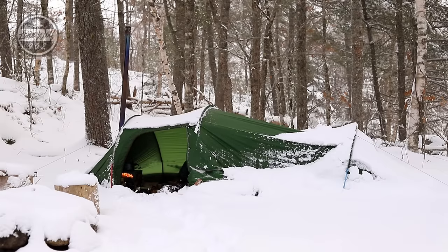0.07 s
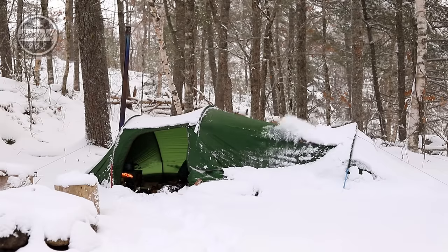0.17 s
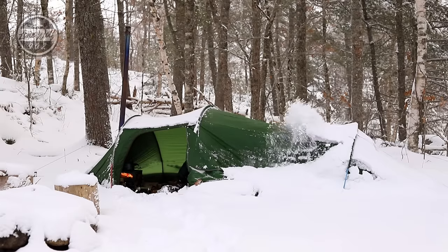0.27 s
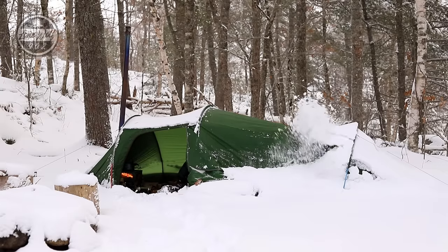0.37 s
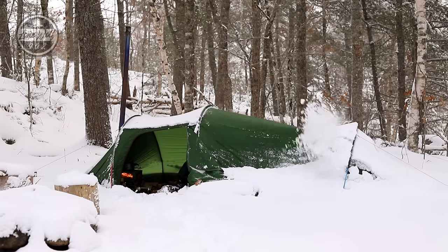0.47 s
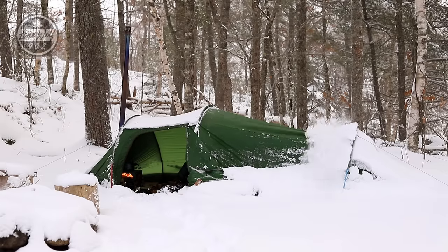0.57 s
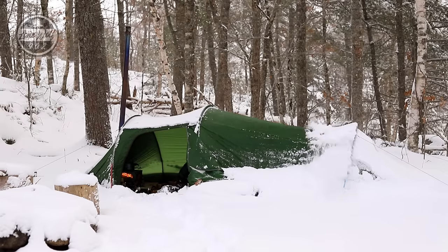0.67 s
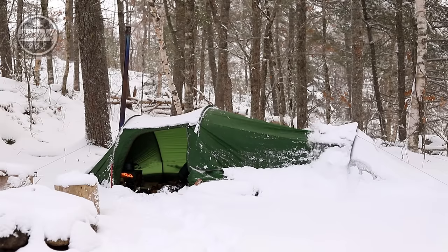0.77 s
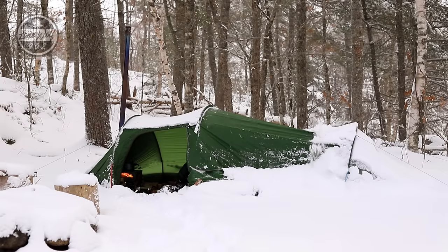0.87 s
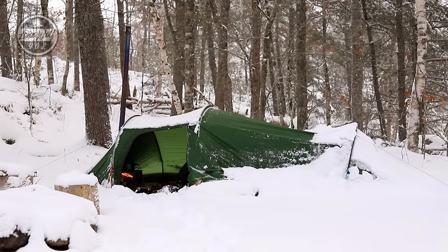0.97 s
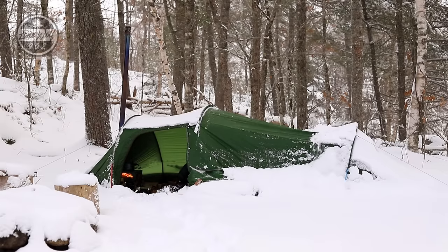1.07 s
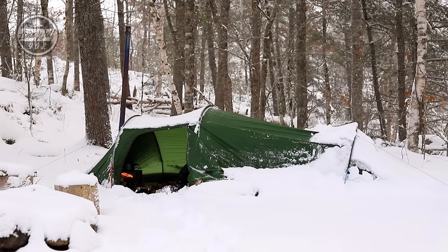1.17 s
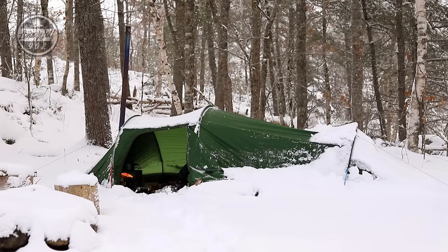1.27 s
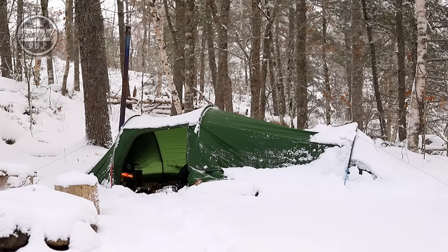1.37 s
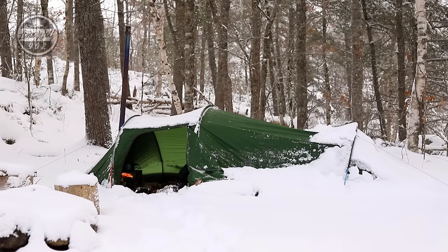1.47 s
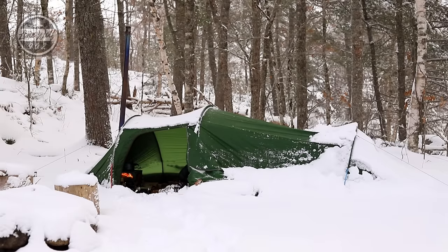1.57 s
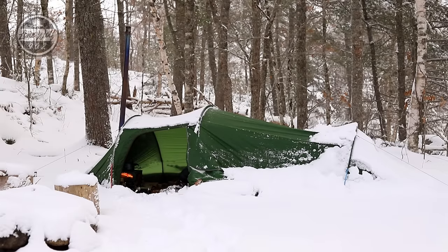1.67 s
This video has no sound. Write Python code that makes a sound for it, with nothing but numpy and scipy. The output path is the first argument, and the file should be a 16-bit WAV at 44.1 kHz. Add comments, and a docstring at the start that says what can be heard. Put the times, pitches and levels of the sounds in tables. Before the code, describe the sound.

Three quick slaps on a snowy tent's cloth, with soft thumps, crinkles and a hiss of sliding snow

```python
"""A still winter forest hushes, as filtered noise, around a snowy tent whose roof is slapped three times from inside.
Each slap sets off a flurry of crinkles (dense random clicks) and a soft thump (damped swings and low noise);
the cloth snaps taut in damped pops and flaps back, and a faint spray of echoes returns from the trees.
Loose snow and powder then hiss down the roof as running grains, a last clump patters off in short bursts of grains,
and light wind, as low noise, rumbles louder towards the end."""
import sys
import numpy as np
from scipy import signal
from scipy.fft import rfft, irfft, next_fast_len
from scipy.io import wavfile

SR = 44100
rng = np.random.default_rng(int(sys.argv[2]) if len(sys.argv) > 2 else 0)


def inscribe(sig):
    """Save sig as 16-bit PCM at rate SR to the path in sys.argv[1].

    A 1-D sig is mono; a 2-D sig holds one channel per row.
    Samples are clipped to [-1, 1] before scaling.
    """
    pcm = np.round(np.clip(np.atleast_2d(sig).T, -1, 1) * 32767)
    wavfile.write(sys.argv[1], SR, pcm.astype(np.int16))


N = 74970
TIME = np.arange(N) / SR  # seconds


def from_db(db):
    """Amplitude ratio: 20 dB are a factor of ten."""
    return 10 ** (np.asarray(db) / 20)


def rms_one(x):
    """Normalisation to unit root-mean-square."""
    return x / np.sqrt(np.mean(x ** 2) + 1e-20)


def coloured(x, spectrum):
    """Minimum-phase filtering: the folded cepstrum gives a causal filter of unit power gain."""
    size = next_fast_len(2 * N)
    table_hz, table_db = np.transpose(spectrum)
    bin_hz = np.arange(size // 2 + 1) * SR / size
    # straight lines over log frequency; 1 Hz is added to avoid log(0)
    gain = from_db(np.interp(np.log(bin_hz + 1), np.log(table_hz), table_db))
    cepstrum = irfft(np.log(rms_one(gain)), size)
    # double the causal half and drop the other
    fold = 1 + np.sign(size // 2 - np.arange(size))
    fold[0] = 1
    response = np.exp(rfft(cepstrum * fold))
    return irfft(rfft(x, size) * response, size)[:N]


def swell(peak_s, rise_s, fall_s, hold_s=0):
    """Energy build-up and decay: Gaussian rise, hold, exponential fall."""
    before_s = np.maximum(peak_s - TIME, 0)
    after_s = np.maximum(TIME - peak_s - hold_s, 0)
    return np.exp(-(before_s / rise_s) ** 2 - after_s / fall_s)


def together(envelopes):
    """Incoherent summation: envelopes of unrelated sounds add in power."""
    return np.sqrt(np.sum(np.square(envelopes), axis=0))


def grains(per_s, spread_db):
    """Shot noise: random clicks of uneven size and either sign, at unit rms."""
    sizes = from_db(spread_db * np.minimum(rng.exponential(1, N), 4))
    signs = rng.choice([-1, 1], N)
    happens = rng.random(N) < per_s / SR
    return rms_one(sizes * signs * happens)


# Colour of the forest hush: frequency_hz, relative_level_db_per_hz
HUSH_COLOUR = [(20, -11), (60, -1.5), (140, -4.5), (300, -8.5), (800, -10), (1500, -14), (2700, -20.5),
               (3500, -17.5), (4300, -22), (6000, -25), (12000, -27.5), (15500, -28.5)]
HUSH_DB = -52.5


def hush():
    """Stationary broadband noise: the steady hush of the forest."""
    return from_db(HUSH_DB) * coloured(rng.standard_normal(N), HUSH_COLOUR)


# Strength of the wind on the microphone: time_s, level_db
WIND_LEVEL = [(0, -69), (1.0, -59), (1.3, -66), (1.42, -55), (1.62, -51.5), (1.7, -51.5)]
# Colour of the wind: frequency_hz, relative_level_db_per_hz
WIND_SPECTRUM = [(5, -25), (20, -10.5), (45, -4), (110, -10.5), (250, -24), (1000, -83)]


def wind():
    """Turbulence noise: random low-frequency pressure whose level follows the wind."""
    strength = from_db(np.interp(TIME, *np.transpose(WIND_LEVEL)))
    return strength * coloured(rng.standard_normal(N), WIND_SPECTRUM)


SCATTER_DB, SCATTER_T60_S, SCATTER_LOWPASS_HZ = -18, .7, 5030
SCATTER_ECHOES_PER_S, SCATTER_SPREAD_DB = 900, 3.5


def trunks(x):
    """Multiple scattering: a faint, dull, decaying spray of echoes from the trees."""
    decay = from_db(-60 * TIME / SCATTER_T60_S)
    travelled = TIME > .02  # no echo returns sooner
    echoes = grains(SCATTER_ECHOES_PER_S, SCATTER_SPREAD_DB) * decay * travelled
    wet = signal.fftconvolve(x, echoes / np.linalg.norm(echoes))[:N]
    dull = signal.butter(1, SCATTER_LOWPASS_HZ, fs=SR, output="sos")
    return from_db(SCATTER_DB) * signal.sosfilt(dull, wet)


GRAINS_PER_S, GRAIN_SPREAD_DB = 5000, 4


def running_grains(swells, spectrum):
    """Granular flow: many small impacts of snow on the cloth, run in swells."""
    flow = together([from_db(db) * swell(peak_s, rise_s, fall_s) for peak_s, db, rise_s, fall_s in swells])
    return coloured(flow * grains(GRAINS_PER_S, GRAIN_SPREAD_DB), spectrum)


# Small lumps of snow drop on the cloth: peak_s, level_db, rise_s, fall_s
LUMP_DROPS = [(0.4565, -34, .0005, 0.0014), (0.963, -44, 0.0024, .005), (1.091, -48, .0005, 0.0015),
              (1.2426, -37.5, .0004, 0.00096), (1.278, -48, 0.017, 0.013), (1.292, -34.5, .0005, 0.0022),
              (1.299, -39, 0.00044, 0.012)]
# Colour of the lumps: frequency_hz, relative_level_db_per_hz
LUMP_COLOUR = [(60, 2), (180, -2), (350, -13.5), (900, -9.5), (1450, -1.5), (2100, -5.5), (2700, -11.5),
               (3500, -5.5), (4500, -18), (7000, -24), (15500, -28)]


def lumps():
    """Fragmentation on impact: each lump bursts into a short crunch of grains."""
    return running_grains(LUMP_DROPS, LUMP_COLOUR)


# Snow slides down the roof, then trickles: peak_s, level_db, rise_s, fall_s
SNOW_SLIDES = [(0.338, -37, 0.052, 0.065), (0.65, -41.5, 0.17, 0.2), (0.97, -49.5, 0.05, 0.33)]
# Colour of the sliding snow: frequency_hz, relative_level_db_per_hz
SNOW_COLOUR = [(60, 2.5), (160, -3.5), (310, -8.5), (500, 0), (900, 1), (1600, 0), (2600, -6), (3500, 0),
               (4200, -12.5), (6500, -20.5), (10000, -19.5), (15500, -29)]
# Puffs of fine powder spray off with it: peak_s, level_db, rise_s, fall_s
POWDER_PUFFS = [(0.33, -52.5, 0.05, .03), (0.507, -44, 0.0033, 0.015), (0.724, -41, 0.01, 0.015),
                (0.85, -52, 0.033, 0.083)]
# Colour of the powder: frequency_hz, relative_level_db_per_hz
POWDER_COLOUR = [(1500, -20), (3500, 0), (5000, 5.5), (6500, -10.5), (10000, -1.5), (15500, -13)]


def sliding_snow():
    """Granular friction: sliding snow gives the body of the hiss, fine powder its treble."""
    return running_grains(SNOW_SLIDES, SNOW_COLOUR) + running_grains(POWDER_PUFFS, POWDER_COLOUR)


def swing(start_s, peak_db, pitch_hz, q):
    """Damped oscillation: a swing of cloth that builds up and dies, faster at low Q."""
    phase = 2 * np.pi * pitch_hz * np.maximum(TIME - start_s, 0)
    motion = np.sin(phase) * phase * np.exp(-phase / (2 * q))
    return from_db(peak_db) * motion / np.abs(motion).max()


# The whole roof takes a blow or billows back: start_s, peak_db, pitch_hz, sharpness_q (no unit)
ROOF_SWINGS = [(0.237, -21, 168.4, 2.7), (0.4916, -27, 113, 1.24), (0.540, -38, 62, 2.8),
               (0.7232, -37.5, 112, 1.24), (0.795, -47, 83.3, 3.1)]


def thuds():
    """Membrane resonance: the whole roof swings under the blows."""
    return sum(swing(*row) for row in ROOF_SWINGS)


# Colour of the crinkling fabric: frequency_hz, relative_level_db_per_hz
FABRIC_COLOUR = [(60, -24.5), (160, -2), (240, -11), (320, -11), (420, -1), (700, -1), (900, 0), (1100, -4),
                 (1500, -0.5), (2100, -6), (2650, -9), (3500, -3.5), (4150, -17.5), (6300, -25),
                 (10000, -26), (15500, -33)]
# Single creases tick in the cloth: time_s, level_db
CREASE_TICKS = [(0.2037, -32), (0.2378, -20), (0.2525, -17.5), (0.2608, -31), (0.2702, -23), (0.3057, -27),
                (0.72, -20), (0.832, -39)]


def ticks():
    """Impulse response: each lone click rings with the colour of the fabric."""
    clicks = np.zeros(N)
    for time_s, db in CREASE_TICKS:
        clicks[int(time_s * SR)] += from_db(db)
    response_peak = np.abs(coloured([1], FABRIC_COLOUR)).max()
    return coloured(clicks, FABRIC_COLOUR) / response_peak


# The cloth snaps taut: start_s, peak_db, pitch_hz
TAUT_SNAPS = [(0.2263, -14, 700), (0.2413, -11, 1250), (0.2443, -26, 810), (0.526, -19.5, 1080),
              (0.7265, -18.5, 510), (0.7413, -15.5, 880), (0.7785, -20, 770)]
SNAP_Q = 0.79


def snaps():
    """Sudden tension: small panels pull taut with a sharp, heavily damped pop."""
    return sum(swing(start_s, db, hz, SNAP_Q) for start_s, db, hz in TAUT_SNAPS)


# Flurries of the fabric: peak_start_s, crinkle_level_db, rise_s, hold_s, crinkle_fall_s, rumble_level_db
FABRIC_FLURRIES = [(0.204, -35, 0.0017, .003, .006, -41), (0.229, -25, 0.01, 0.0015, 0.0047, -38),
                   (0.238, -22.5, 0.0043, 0.019, 0.0072, -36.5), (0.26, -30, 0.0043, 0.0099, 0.017, -46),
                   (0.369, -37, 0.0017, 0.0022, 0.0065, -44), (0.471, -40.5, 0.0096, 0.0071, 0.007, -50),
                   (0.492, -27.5, 0.0049, 0.015, 0.047, -34.5), (0.566, -32.5, 0.0035, 0.0026, 0.005, -50),
                   (0.584, -33.5, 0.0067, 0.0021, 0.0035, -45), (0.693, -37.5, 0.0053, .004, .012, -37.5),
                   (0.719, -32, 0.01, 0.017, 0.035, -41), (0.77, -34.5, 0.017, 0.0091, 0.021, -40.5),
                   (0.83, -44, 0.014, 0.023, 0.032, -49)]
# Colour of the low flutter: frequency_hz, relative_level_db_per_hz
FLUTTER_COLOUR = [(20, -30), (40, -10), (62, 2.5), (110, -4), (160, -2.5), (280, -11), (700, -36),
                  (3000, -85)]
FLUTTER_FALL_S = 0.024


def flutter():
    """Volume displacement: the fluttering roof pushes air as low noise with every flurry."""
    push = together([from_db(rumble_db) * swell(peak_s, rise_s, FLUTTER_FALL_S, hold_s)
                     for peak_s, _, rise_s, hold_s, _, rumble_db in FABRIC_FLURRIES])
    return coloured(push * rng.standard_normal(N), FLUTTER_COLOUR)


CRINKLES_PER_S, CRINKLE_SPREAD_DB = 4500, 3.5


def crinkles():
    """Buckling instability: the stiff fabric clicks in dense tiny buckles under each flurry."""
    effort = together([from_db(db) * swell(peak_s, rise_s, fall_s, hold_s)
                       for peak_s, db, rise_s, hold_s, fall_s, _ in FABRIC_FLURRIES])
    return coloured(effort * grains(CRINKLES_PER_S, CRINKLE_SPREAD_DB), FABRIC_COLOUR)


def scene():
    """Superposition: the tent, its echoes from the trees, the wind and the hush add up."""
    snow = lumps() + sliding_snow()
    cloth = thuds() + ticks() + snaps() + flutter() + crinkles()
    tent = snow + cloth
    return (hush() + wind() + trunks(tent) + tent)[None]


CUTOFF_HZ = 15800


def record(dry):
    """Band limitation: a steep elliptic low-pass cuts the top."""
    lowpass = signal.ellip(12, .1, 80, CUTOFF_HZ, fs=SR, output="sos")  # ripple dB, stopband dB
    return signal.sosfilt(lowpass, dry)


dry = scene()
out = record(dry)
inscribe(out)
```